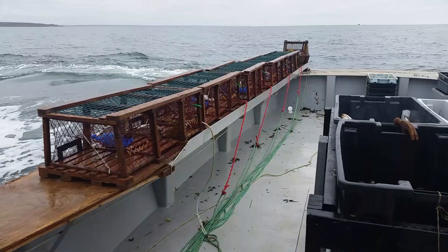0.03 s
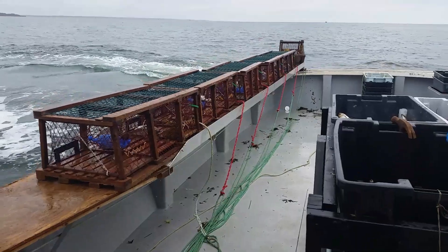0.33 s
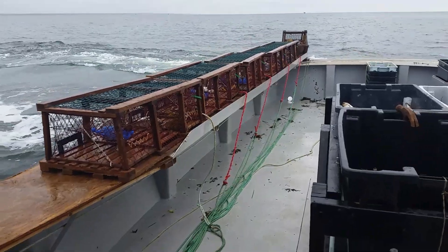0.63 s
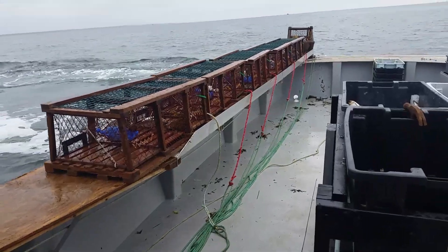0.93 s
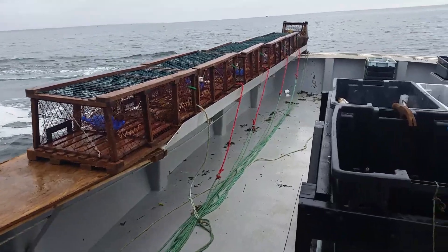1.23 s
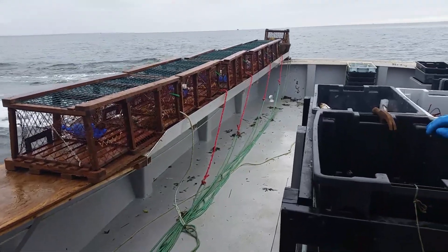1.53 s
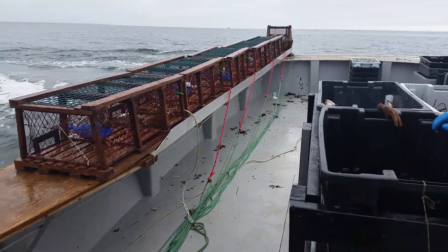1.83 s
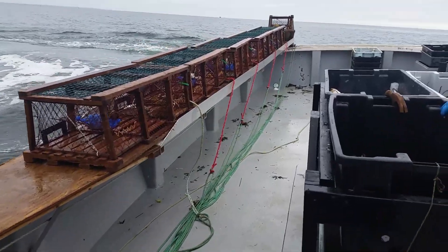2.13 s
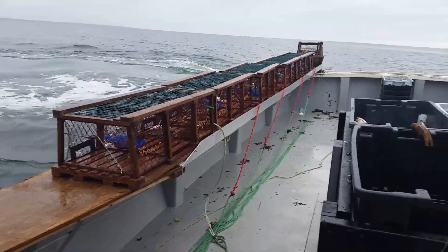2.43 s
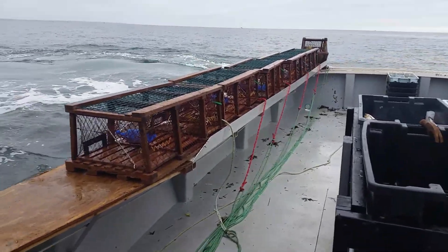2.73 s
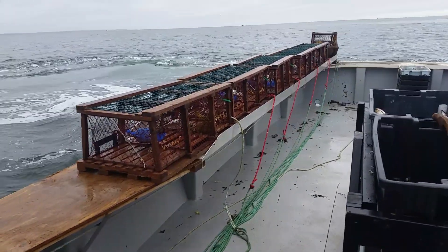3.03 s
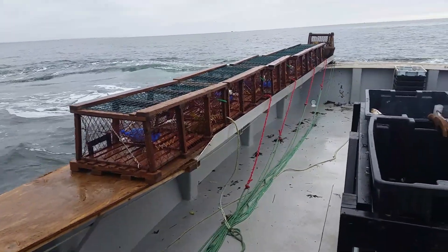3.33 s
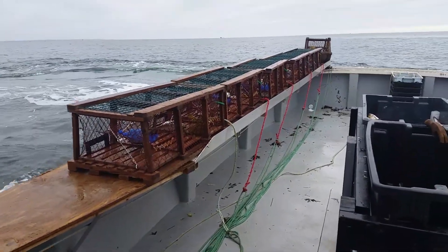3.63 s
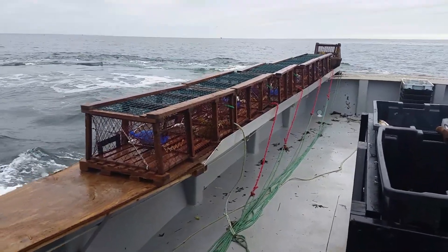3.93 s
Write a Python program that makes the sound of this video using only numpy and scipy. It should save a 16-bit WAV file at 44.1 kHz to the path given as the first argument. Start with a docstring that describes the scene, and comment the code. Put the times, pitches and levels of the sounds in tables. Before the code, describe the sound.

A fishing boat's diesel engine drones and burbles on deck, over washing water and spray.

```python
"""A six-cylinder diesel drives a fishing boat and eases off in two small steps, heard from the deck.
Its firings drone from the wet exhaust and blow burbling puffs through the water. The engine shakes
the hull into a hum, its valves clatter, and a thin gear whine comes up at the lowest speed.
Loose gear knocks on deck as the boat meets a wave, and spray hisses for a second.
Behind it all the wake washes and fizzes. The sound fades in after a short silence."""
import sys
import numpy as np
from scipy import signal
from scipy.fft import rfft, irfft
from scipy.io import wavfile
from scipy.ndimage import uniform_filter1d, map_coordinates

SR = 44100
rng = np.random.default_rng(int(sys.argv[2]) if len(sys.argv) > 2 else 0)


def transcribe(signal):
    """Save signal, clipped to [-1, 1], as a 16-bit WAV file at the path in sys.argv[1]."""
    frames = np.atleast_2d(signal).T
    limited = np.clip(frames, -1, 1)
    pcm = np.round(limited * 32767).astype(np.int16)
    wavfile.write(sys.argv[1], SR, pcm)


N = 176400
T = np.arange(N) / SR
FREQUENCIES = np.arange(N // 2 + 1) * SR / N
CYLINDERS = 6

# how fast the engine fires (time [s], firing rate [Hz])
FIRING_RATE = [(0.95, 59.4), (1.15, 56.2), (1.45, 55.75), (2.25, 55.7), (2.45, 53), (3.5, 52.7), (4, 52.9)]
# the tones in the exhaust drone (pitch [times the firing rate], relative level [dB])
DRONE_TONES = [(.5, -26), (1, 0), (1.5, -17), (2, -12.5), (3, -21.5), (4, -22), (5, -19)]
# narrow bands where the engine block and covers ring (frequency [Hz], boost [dB])
BLOCK_RINGS = [(807, 3.5), (1023, 6.5), (1293, 0), (1390, 7.5), (1460, 6), (1751, 2.5), (1904, 4.5),
               (2207, 2.5), (2304, 0.5), (2363, 8)]
# the gear tones (pitch at the final engine speed [Hz], level [dB])
WHINE_TONES = [(980, -45.5), (1196, -45), (1294, -69), (1385, -52), (1462, -49)]
# when loose gear hits and bounces (time [s], deck level [dB], metal level [dB])
KNOCK_HITS = [(1.165, -19.5, -39), (1.177, -21.5, -41), (2.304, -11, -31), (2.316, -12, -35.5),
              (2.333, -21, -32), (3.905, -24.5, -56)]
# the tones of struck deck and metal (pitch [Hz], relative level [dB], time to fade by 60 dB [s])
DECK_TONES = [(243, -18, 0.066), (295.8, 1, 0.18), (353, -3, 0.099), (398, -8, 0.084), (520, -12.5, 0.073),
              (660, -15.5, 0.042), (787, -14, 0.09), (1030, -20, 0.05)]
METAL_TONES = [(4170, -7, .11), (6920, -10, 0.16), (10700, 1, 0.15), (11900, 4, 0.095)]

# how loud each source is as time passes (time [s], level [dB])
DRONE_LEVEL = [(0.7, -15.5), (0.87, -9.5), (0.96, -17), (1.39, -10.5), (1.69, -15.5), (1.88, -9),
               (2.03, -17), (2.27, -15.5), (2.4, -26.5), (2.76, -14.5), (2.96, -25.5), (3.04, -20),
               (3.44, -15.5), (3.61, -19.5), (3.73, -12.5), (4.0, -15)]
BURBLE_LOW_LEVEL = [(.6, -22.5), (.8, -21), (1.0, -14), (1.22, -15), (1.4, -21.5), (1.7, -18.5),
                    (2.0, -21.5), (2.26, -21.5), (2.45, -33.5), (3.2, -26.5), (4, -23.5)]
BURBLE_HIGH_LEVEL = [(.6, -21), (.75, -19.5), (1.25, -18), (1.7, -19), (1.95, -15.5), (2.15, -12.5),
                     (2.28, -15), (2.48, -16.5), (2.65, -25.5), (2.87, -20.5), (3.15, -32.5), (3.6, -29.5),
                     (4, -27.5)]
HULL_LEVEL = [(.6, -25.5), (1.2, -24), (2.2, -23.5), (2.7, -23), (3.2, -25), (3.6, -20), (3.8, -25),
              (4, -16.5)]
CLATTER_LEVEL = [(.6, -24.5), (1.3, -29), (2.3, -27), (3.2, -29.5), (3.6, -26.5), (4, -27.5)]
WASH_LEVEL = [(.6, -23), (.8, -27), (.95, -24), (1.1, -40), (1.35, -31), (1.65, -27.5), (2.1, -39.5),
              (3.4, -32.5), (3.7, -31), (4, -29.5)]
FOAM_LEVEL = [(.6, -38), (.95, -38.5), (1.1, -41), (1.3, -49), (1.5, -41), (1.7, -38.5), (1.95, -45),
              (2.2, -44), (2.6, -42), (3.3, -51), (3.45, -47), (3.7, -44), (4, -45)]
SPRAY_LEVEL = [(1.9, -55), (2.15, -38), (2.27, -33), (2.35, -26), (2.48, -25.5), (2.6, -22), (3.05, -19),
               (3.22, -20), (3.35, -24), (3.42, -37.5), (3.8, -40), (4, -34.5)]

# how much bass, middle and treble each noise has (frequency [Hz], relative level [dB])
BURBLE_LOW_SPECTRUM = [(30, -45), (65, -34), (85, -3), (110, 8), (135, -6), (165, -7), (300, -28),
                       (900, -90)]
BURBLE_HIGH_SPECTRUM = [(60, -55), (110, -11.5), (133, 0), (163, 0.5), (185, -2.5), (220, -16.5),
                        (300, -22), (450, -35.5), (900, -51)]
HULL_SPECTRUM = [(25, -18), (60, 1), (100, -13), (170, 1), (215, -1), (265, 2), (300, -6), (335, -9.5),
                 (375, -8.5), (450, -18), (600, -25), (1200, -61)]
CLATTER_SPECTRUM = [(250, -49), (450, -6), (590, -5), (780, 1.5), (900, -3), (1050, 0), (1400, 1),
                    (1650, -3.5), (1900, -.5), (2050, -1.5), (2300, 3), (2700, -9), (3500, -18),
                    (4300, -16), (4900, -14.5), (5400, -25), (6300, -22.5), (8000, -31), (11000, -9),
                    (16000, -24)]
WASH_SPECTRUM = [(200, 12), (600, -8.5), (1200, 1), (2400, -0.5), (3300, -11.5), (5000, -20.5), (8200, -17),
                 (9500, -23.5), (11000, -11.5), (12200, -9), (13500, -35), (16000, -47)]
FOAM_SPECTRUM = [(1200, -18), (2400, 4), (2900, -2), (3600, -5.5), (4400, -7.5), (5000, 2.5), (5450, -11),
                 (6200, -5.5), (7200, -12), (9000, -28), (11500, -7), (16000, -26)]
SPRAY_SPECTRUM = [(1000, -14.5), (2500, -7), (4200, -12), (6300, -17), (7800, -17.5), (9200, -10.5),
                  (10400, 1.5), (11400, 5), (12500, 2), (13800, -4.5), (16000, -13)]

# how alike left and right are (frequency [Hz], likeness [1 = the same, 0 = unrelated])
STEREO_LIKENESS = [(100, 1), (290, 0.93), (640, 0.65), (950, 0.27), (1400, -.2), (3000, 0)]
# how much louder the left microphone port is (frequency [Hz], left minus right [dB])
STEREO_BALANCE = [(100, 1.35), (1400, -0.1), (2400, 0), (3400, -8), (4800, -13.5), (6300, -12), (7500, 0),
                  (9000, 3.5), (10200, 8.5), (11600, -1.5), (13000, -2), (15500, 7)]


def exhaust(firings):
    """The firings drone from the pipe; each higher tone lags and wavers a little."""
    drone_db = curve(DRONE_LEVEL)
    out = 0
    for multiple, db in DRONE_TONES:
        level_db = drone_db + 1.16 * wander(18) if multiple == 1 else drone_db.mean() + 2.5 * wander(7.7)
        lag_turns = 0.06 * multiple ** 2
        out += gain(db + level_db) * np.cos(2 * np.pi * (multiple * firings - lag_turns))
    return np.sqrt(2) * out


def burble(firings):
    """Each firing blows a puff through the water; the pipe rings in two bands as the boat rolls."""
    bands = (BURBLE_LOW_LEVEL, BURBLE_LOW_SPECTRUM), (BURBLE_HIGH_LEVEL, BURBLE_HIGH_SPECTRUM)
    out = 0
    for level, spectrum in bands:
        puffs = engine_noise(firings, repeat_share=0.44) * pulse(firings, depth_db=2.5)
        out += steady(shape_noise(puffs, spectrum), amount=0.63) * gain(curve(level))
    return out


def hull(firings):
    """The uneven cylinders shake deck and hull into a low hum."""
    shake = engine_noise(firings, repeat_share=0.5) * pulse(firings, depth_db=2.5)
    hum = steady(shape_noise(shake, HULL_SPECTRUM), amount=0.94, window=2200)
    return hum * gain(curve(HULL_LEVEL))


def clatter(firings, ring_width_hz=5.9):
    """Valves and fuel injectors rattle several times per firing and make the engine block ring."""
    ticks = pulse(firings, -0.3) * pulse(2 * firings, 0.2) * pulse(firings * CYLINDERS / 2, -0.3)
    rattle = engine_noise(firings, repeat_share=0.69) * ticks
    block = 1 + sum((gain(db) - 1) / (1 + 2j * (FREQUENCIES - hz) / ring_width_hz)
                    for hz, db in BLOCK_RINGS)
    ringing = irfft(rfft(rattle) * block, N)
    return shape_noise(ringing, CLATTER_SPECTRUM) * gain(curve(CLATTER_LEVEL) + 0.54 * wander(30.26))


def gear_whine(firings, final_rate_hz, start_s=2.32, rise_s=0.2):
    """The gears sing thin tones whose pitch follows the engine speed."""
    engine_time = firings / final_rate_hz
    out = np.zeros((2, N))
    for channel in out:
        for hz, db in WHINE_TONES:
            loudness = gain(db + 1.7 * wander(14))
            channel += loudness * np.sin(2 * np.pi * hz * engine_time + 0.98 * wander(11))
    return np.sqrt(2) * out * np.clip((T - start_s) / rise_s, 0, 1)


def knocks(crack_decay_s=0.008):
    """Loose gear thuds on the deck; a metal fitting cracks and clinks with it."""
    out = np.zeros((2, N))
    for start_s, deck_db, metal_db in KNOCK_HITS:
        first = int(start_s * SR)
        age = T[:min(SR // 2, N - first)]
        crack = gain(2) * rng.standard_normal((2, len(age))) * np.exp(-age / crack_decay_s)
        thud = gain(deck_db) * ring(age, DECK_TONES)
        clink = gain(metal_db) * (ring(age, METAL_TONES) + crack)
        out[:, first:first + len(age)] += thud + clink
    return out


def water():
    """The wake washes and its foam fizzes all the time; spray patters down after the big wave."""
    wash = shape_noise(drops(spread_db=3.5), WASH_SPECTRUM) * gain(curve(WASH_LEVEL) + 1.5 * wander(22.18))
    foam = shape_noise(drops(spread_db=1), FOAM_SPECTRUM) * gain(curve(FOAM_LEVEL) + 2.6 * wander(24.95))
    spray = shape_noise(drops(spread_db=1), SPRAY_SPECTRUM) * gain(curve(SPRAY_LEVEL) + 0.81 * wander(35))
    return wash + foam + spray


def engine_noise(firings, repeat_share, points=4096, drift_hz=1.2):
    """Part of this noise comes back on every engine cycle, in a pattern that slowly changes."""
    position = (firings / CYLINDERS) % 1 * points  # in one cycle every cylinder fires once
    repeating = 0
    for _ in range(4):
        patterns = rng.standard_normal((2, points))
        looped = np.array([np.interp(position, np.arange(points), side) for side in patterns])
        repeating += wander(drift_hz) * looped
    repeating /= np.sqrt(uniform_filter1d(repeating ** 2, points))
    fresh = rng.standard_normal((2, N))
    return np.sqrt(repeat_share) * repeating + np.sqrt(1 - repeat_share) * fresh


def pulse(turns, depth_db):
    """A volume that rises and falls once per turn."""
    return gain(depth_db * np.cos(2 * np.pi * turns))


def steady(noise, amount, window=3000):
    """Evens out slow swells, as the engine gives the same power on every turn."""
    power = np.mean(noise ** 2, axis=0)
    smooth_power = uniform_filter1d(uniform_filter1d(power, window), window // 2)
    return normalise(noise / smooth_power ** (amount / 2))


def ring(age, tones, detune_hz=6):
    """A struck object's tones die away, a little out of tune on each blow."""
    return sum(gain(db - 60 * age / fade_s)
               * np.sin(2 * np.pi * (hz + detune_hz * rng.standard_normal()) * age)
               for hz, db, fade_s in tones)


def drops(spread_db, per_second=8000):
    """Many tiny drops land at random, each a click of its own size."""
    lands = rng.random((2, N)) < per_second / SR
    size = gain(spread_db * rng.standard_normal((2, N)))
    direction = np.sign(rng.standard_normal((2, N)))
    return normalise(lands * direction * size)


def shape_noise(pair, spectrum):
    """Turns two unrelated noises into a stereo sound with this spectrum, alike in the bass."""
    first, second = rfft(pair) * gain(by_frequency(spectrum))
    likeness = by_frequency(STEREO_LIKENESS)
    shared, apart = first * np.sqrt(1 + likeness), second * np.sqrt(1 - likeness)
    return normalise(irfft(np.array([shared + apart, shared - apart]), N))


def wander(rate_hz):
    """A smooth random wobble with a typical size of 1."""
    targets = rng.standard_normal(1024)
    return normalise(map_coordinates(targets, [T * rate_hz], order=3, mode="wrap"))


def curve(rows):
    """Joins (time [s], value) rows with straight lines."""
    return np.interp(T, *np.array(rows).T)


def by_frequency(rows):
    """Joins (frequency [Hz], value) rows, giving each octave equal room."""
    hz, value = np.array(rows).T
    return np.interp(np.log(FREQUENCIES + 1), np.log(hz), value)


def gain(db):
    """Turns decibels into a number to multiply by."""
    return 10 ** (np.asarray(db) / 20)


def normalise(x):
    """Scales a signal to an average power of 1."""
    return x / np.sqrt(np.mean(x ** 2))


def scene():
    """Engine and sea as heard on deck."""
    rate_hz = curve(FIRING_RATE)
    firings = np.cumsum(rate_hz * (1 + 0.00081 * wander(10))) / SR  # how many firings so far
    engine = exhaust(firings) + burble(firings) + hull(firings) + clatter(firings)
    return engine + gear_whine(firings, rate_hz[-1]) + water() + knocks()


def record(dry, silence_s=0.37, fade_s=0.35, top_hz=15800):
    """Gives left and right a different treble, fades in, rounds the peaks and cuts the highest hiss."""
    tilt_db = by_frequency(STEREO_BALANCE) / 2
    tilted = irfft(rfft(dry) * gain([tilt_db, -tilt_db]), N)
    faded = tilted * np.clip((T - silence_s) / fade_s, 0, 1) ** 0.92
    rounded = faded / (1 + faded ** 8) ** (1 / 8)
    low_pass = signal.ellip(12, 0.1, 80, top_hz, fs=SR, output="sos")
    return signal.sosfilt(low_pass, rounded)


dry = scene()
out = record(dry)
transcribe(out)
```